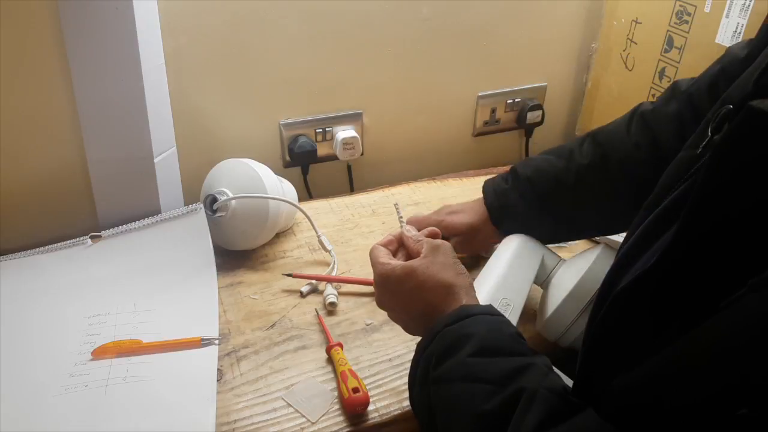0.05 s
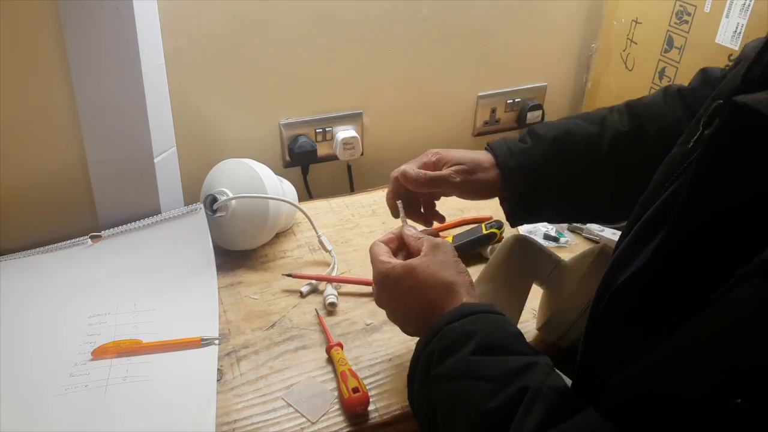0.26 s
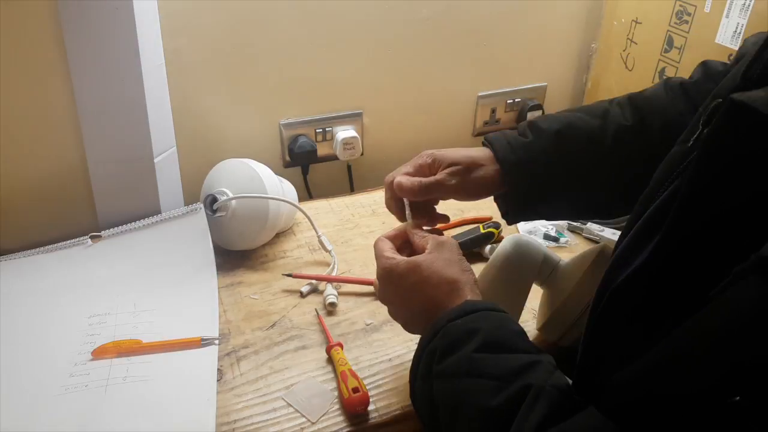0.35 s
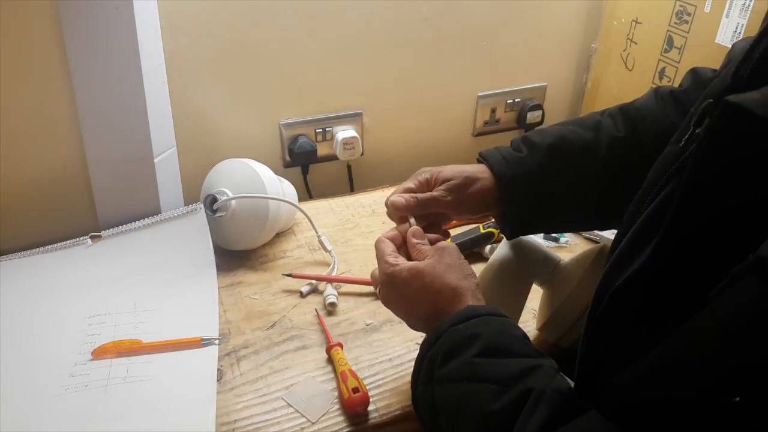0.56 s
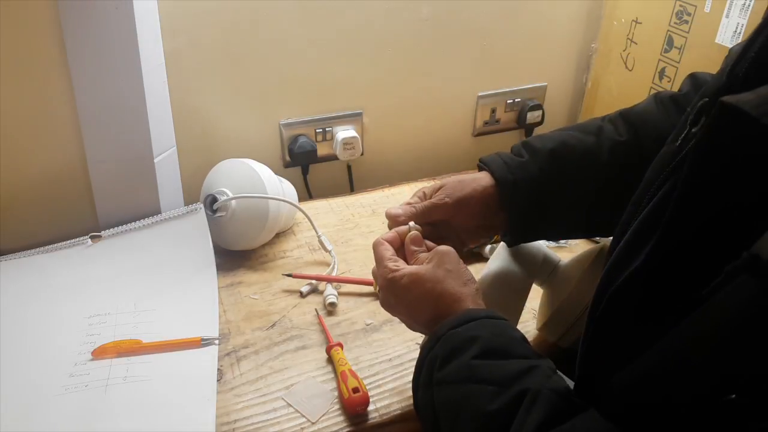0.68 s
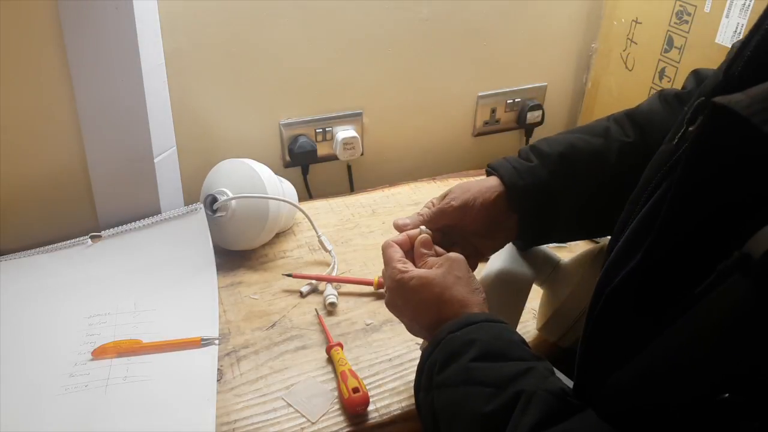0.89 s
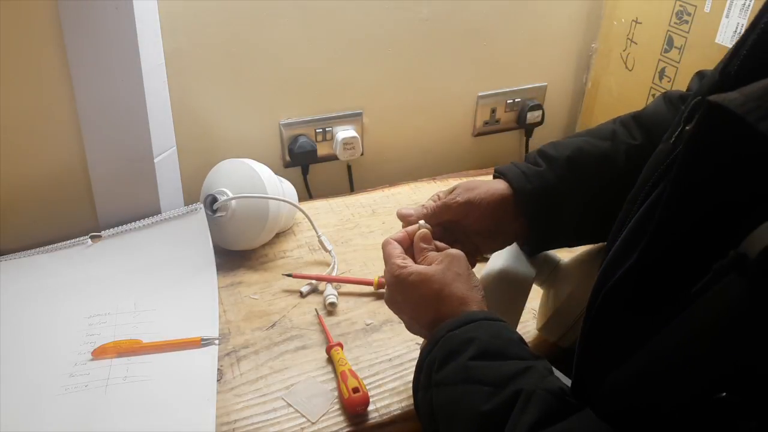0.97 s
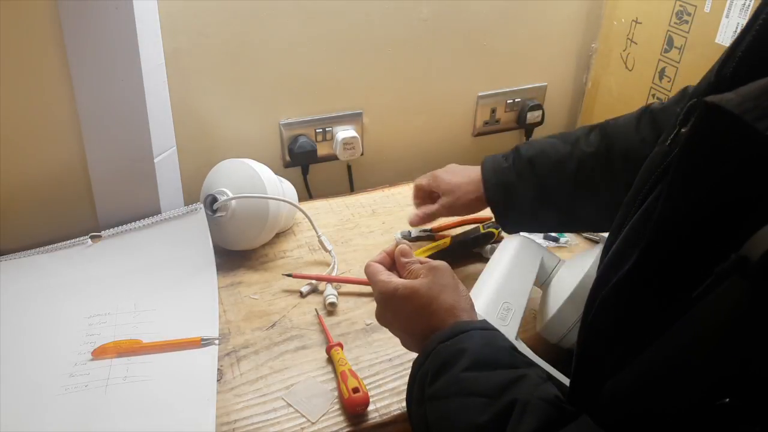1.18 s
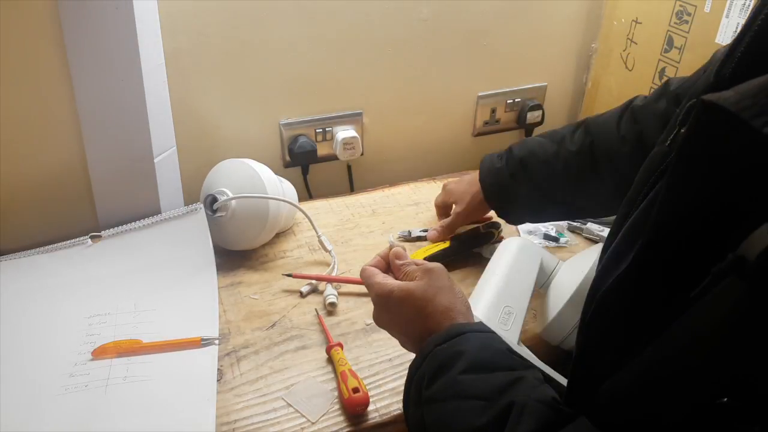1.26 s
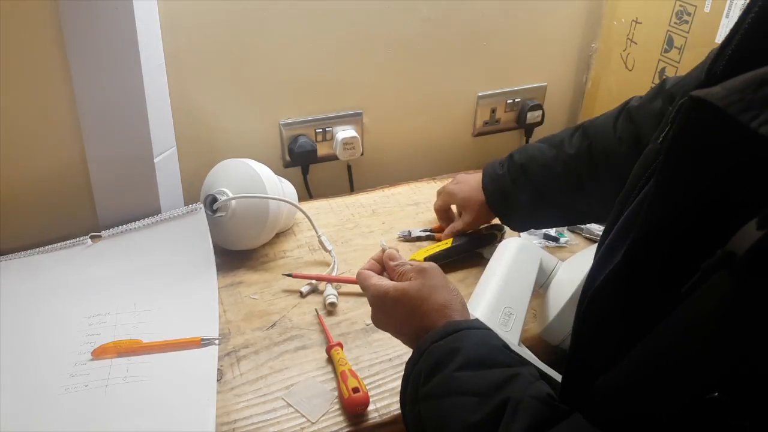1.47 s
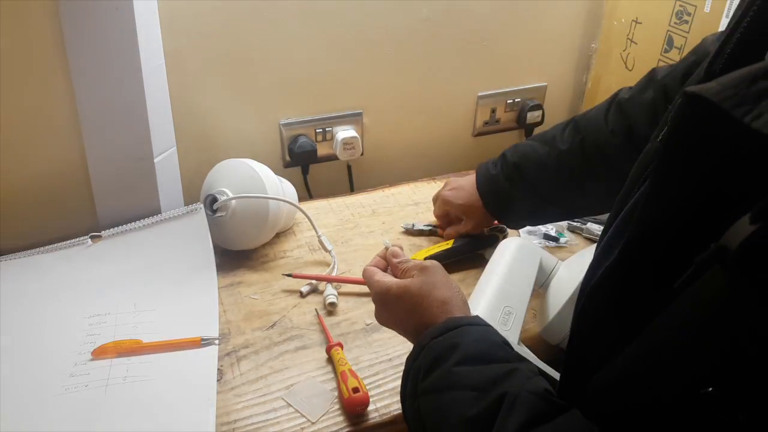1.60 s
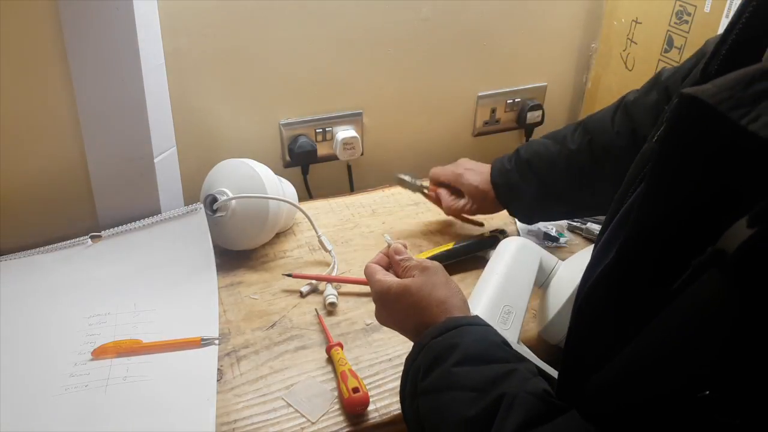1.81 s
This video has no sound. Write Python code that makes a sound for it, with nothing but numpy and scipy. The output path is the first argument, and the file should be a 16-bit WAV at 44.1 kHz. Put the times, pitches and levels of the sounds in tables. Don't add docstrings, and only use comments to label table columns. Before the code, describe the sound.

Close view of bench work in a small echoing room: metal tick, plastic grip rattle, loud tool drop with weakening bounces, near silence, soft scraping judder, a quick wire snip, then a tool laid down softly.

```python
import sys
import numpy as np
from scipy import signal
from scipy.fft import rfft, irfft
from scipy.io import wavfile
from scipy.ndimage import uniform_filter1d

SR = 44100
rng = np.random.default_rng(int(sys.argv[2]) if len(sys.argv) > 2 else 0)


def amplitude_ratio(level_db):
    exponent = np.asarray(level_db, float) / 20
    return 10 ** exponent


def put_to_file(sound):
    columns = np.atleast_2d(sound).T
    safe = np.clip(columns, -1, 1)
    whole_steps = np.round(safe * 32767)
    wavfile.write(sys.argv[1], SR, whole_steps.astype(np.int16))


N = 81585


def colour(x, points):
    p, size = np.array(points, float), 4096
    hz = np.maximum(np.arange(size // 2 + 1) * SR / size, 1)
    log_gain = np.interp(np.log(hz), np.log(p[:, 0]), p[:, 1]) * np.log(10) / 20
    cepstrum = irfft(log_gain)
    cepstrum[1:size // 2] *= 2
    cepstrum[size // 2 + 1:] = 0
    response = irfft(np.exp(rfft(cepstrum)))
    return signal.fftconvolve(x, response)[:len(x)]


def ring(x, modes):
    out = 0
    for hz, db, t60 in modes:
        pole = np.exp(2j * np.pi * hz / SR - np.log(1000) / (max(t60, .003) * SR))
        out = out + amplitude_ratio(db) * signal.lfilter([1], [1, -pole], x).imag
    return out


def unit(x):
    return x / np.sqrt(np.mean(x ** 2))


def curve(rows, outside_db=None):
    r = np.array(rows, float)
    return amplitude_ratio(np.interp(np.arange(N) / SR, r[:, 0], r[:, 1], outside_db, outside_db))


def clicks(per_s, spread_db):
    chance, sign, size = rng.random((3, N))
    happens = chance < per_s / SR
    return unit(happens * np.sign(sign - .5) * amplitude_ratio(-spread_db * np.log(size + 0.035)))


def body(push, blow, modes, tint, ring_db, wet_db):
    ring_send_db = -6
    probe = signal.unit_impulse(8192)
    plain_size = np.sqrt(np.sum(colour(probe, tint) ** 2))
    ring_size = np.sqrt(np.sum(ring(probe, modes) ** 2))
    plain = colour(push, tint) / plain_size
    rung = amplitude_ratio(ring_db) * ring(push + blow, modes) / ring_size
    return np.array([plain + rung, amplitude_ratio(wet_db) * (plain + amplitude_ratio(ring_send_db) * rung)])


def contact(rows, modes, tint, ring_db, wet_db):
    bite_s, blow_db = 0.0021, 16
    t, push, blow = np.arange(N) / SR, np.zeros(N), np.zeros(N)
    grit = clicks(per_s=7000, spread_db=1)
    for start_s, db, length_s in rows:
        age = np.maximum(t - start_s, 0)
        swell = (1 - np.exp(-age / bite_s)) * np.exp(-(age / length_s) ** 3)
        push += amplitude_ratio(db) * swell * grit * np.sqrt(0.015 / length_s)
        blow[int((start_s + bite_s) * SR)] = amplitude_ratio(db + blow_db)
    return body(push, blow, modes, tint, ring_db, wet_db)


# pitch_hz, level_db per Hz
AIR_COLOUR = [(50, -7), (118, 3), (148, -6), (185, -5), (260, 0), (700, -5), (3500, -16), (15800, -24)]


def room_hiss():
    return amplitude_ratio(-69) * unit(colour(rng.standard_normal(N), AIR_COLOUR))


# pitch_hz, level_db
EARLIER_COLOUR = [(200, -9.5), (500, -12.5), (1500, -5), (3000, -9.5), (7500, -18.5), (9000, -23.5),
                  (15500, -31.5)]


def earlier_clink():
    start_db, t60_s = -65.5, 1
    fade = amplitude_ratio(start_db - 60 * np.arange(N) / SR / t60_s)
    return fade * unit(colour(rng.standard_normal(N), EARLIER_COLOUR))


# pitch_hz, level_db (rms)
HUM = [(100, -84), (200, -70), (300, -74)]


def mains_hum():
    t, wobble_db = np.arange(N) / SR, 1.5
    wobble = rng.standard_normal((len(HUM), N))
    for _ in range(2):
        wobble = uniform_filter1d(wobble, 3000, axis=1)
    hum = np.zeros(N)
    for (hz, db), w in zip(HUM, unit(wobble)):
        hum += amplitude_ratio(db + wobble_db * w) * np.sqrt(2) * np.sin(2 * np.pi * hz * t)
    return hum


# time_s, level_db
SWAY = [(0.0, -79), (0.108, -70), (0.318, -60), (0.51, -57), (0.524, -64.5), (0.886, -92), (0.922, -78),
        (1.24, -87.5), (1.452, -67), (1.72, -70.5), (1.736, -71), (1.85, -68)]


def bench_sway():
    sway_hz, width_hz = 43, 22
    b, a = signal.iirpeak(sway_hz, sway_hz / width_hz, fs=SR)
    sway = signal.lfilter(b, a, signal.lfilter(b, a, rng.standard_normal(N)))
    sway = sway / (np.abs(signal.hilbert(sway)) + .4 * np.std(sway))
    return unit(sway) * curve(SWAY)


# pitch_hz, t60_s
ROOM_DECAY = [(150, 0.27), (400, 0.27), (1000, 0.25), (2500, 0.27), (6000, 0.26), (12000, 0.22)]


def room(x):
    rise_s, direct_db = 0.011, 0.5
    t, decay, tail = np.arange(SR * 7 // 10) / SR, np.array(ROOM_DECAY), 0
    edges = np.r_[30, np.sqrt(decay[1:, 0] * decay[:-1, 0]), 18000]
    for low_hz, high_hz, t60_s in zip(edges, edges[1:], decay[:, 1]):
        band_pass = signal.butter(2, [low_hz, high_hz], "bandpass", fs=SR, output="sos")
        band = signal.sosfilt(band_pass, rng.standard_normal(len(t)))
        tail = tail + band * amplitude_ratio(-60 * t / t60_s)
    tail = tail * (1 - np.exp(-t / rise_s))
    tail = tail / np.sqrt(np.sum(tail ** 2))
    return amplitude_ratio(direct_db) * x[0] + signal.fftconvolve(x[1], tail)[:N]


# time_s, level_db
SLIDE = [(1.16, -87), (1.19, -67), (1.21, -57), (1.245, -66.5), (1.29, -76.5), (1.4, -96), (1.55, -87),
         (1.7, -91)]
# pitch_hz, level_db, t60_s
SLIDE_MODES = [(1970, -5, 0.018), (3030, -19, 0.0096), (4040, -6.5, 0.035), (6330, -16, .01),
               (7550, 3.5, 0.013)]
# pitch_hz, level_db
SLIDE_COLOUR = [(300, -34), (900, -17.5), (2900, -15), (3630, -8.5), (4840, -20), (8500, -13),
                (11500, -22.5), (15500, -25)]


def slide():
    scrape = clicks(per_s=9500, spread_db=1.6) * curve(SLIDE, outside_db=-120)
    return body(scrape, 0, SLIDE_MODES, SLIDE_COLOUR, ring_db=-9.5, wet_db=-1.43)


# time_s, level_db
JUDDER = [(1.262, -65), (1.282, -61), (1.296, -63.5), (1.312, -56.5), (1.322, -56), (1.338, -55.5),
          (1.352, -63), (1.368, -52), (1.384, -55.5), (1.396, -60), (1.425, -60), (1.445, -84)]
# pitch_hz, level_db, t60_s
BUMP_MODES = [(150, 0, .03), (298, -12, .04), (440, -20, .04), (570, -20, .04), (1190, -26, .03)]
# pitch_hz, level_db
BUMP_COLOUR = [(59, -21.5), (100, -9.5), (144, -15.5), (312, -16), (368, -13.5), (571, -16), (8000, -44.5),
               (10400, -65), (17600, -120)]


def judder():
    jolts_per_s, jitter, scatter_db, rub_db = 150, .03, 2, -3
    uneven = rng.standard_normal((400, 2))
    at = (np.cumsum(1 + jitter * uneven[:, 0]) / jolts_per_s * SR).astype(int)
    inside = at < N
    jolts = np.zeros(N)
    jolts[at[inside]] = amplitude_ratio(scatter_db * uneven[inside, 1])
    effort = curve(JUDDER, outside_db=-120)
    rub = amplitude_ratio(rub_db) * clicks(per_s=3100, spread_db=1.9) * effort
    return body(rub, unit(jolts) * effort, BUMP_MODES, BUMP_COLOUR, ring_db=1, wet_db=-14)


# start_s, level_db, length_s
TAPS = [
    (.871, -60, 0.0048),
    (1.408, -60, 0.007),
    (1.463, -76, 0.01),
    (1.572, -68.5, .01),
]
# pitch_hz, level_db, t60_s
TAP_MODES = [(255, 5, 0.05), (638, -3, 0.035)]


def taps():
    return contact(TAPS, TAP_MODES, BUMP_COLOUR, ring_db=6.9, wet_db=-2)


# start_s, level_db, length_s
SET_DOWN = [
    (1.802, -55, 0.01),
    (1.808, -55, 0.0048),
    (1.815, -54.5, 0.0066),
    (1.832, -57.5, 0.035),
]
# pitch_hz, level_db, t60_s
SET_DOWN_MODES = [(301, 0, .1), (630, -3, .08), (1070, -2, .06), (1250, -1, .04), (1890, 1, .05),
                  (2700, -9, .04), (3130, -11, .04), (3950, -15, .03), (6680, -18, .03), (7690, -11, .05)]
# pitch_hz, level_db
SET_DOWN_COLOUR = [(100, -28), (300, -2), (1000, -1), (2000, -5.5), (4300, -20), (5200, -24.5),
                   (8000, -23.5), (15500, -44)]


def set_down():
    return contact(SET_DOWN, SET_DOWN_MODES, SET_DOWN_COLOUR, ring_db=0.1, wet_db=-3.7)


# start_s, level_db, length_s
WIRE_TICKS = [
    (.2065, -54.5, 0.0068),
    (.591, -72.5, 0.013),
    (1.605, -48.5, 0.0095),
]
# pitch_hz, level_db, t60_s
WIRE_MODES = [(6600, -6, .02), (7350, 0, .03), (8400, -3, .015), (9350, -1, .02), (9850, -1, .025),
              (11100, -6, .012)]
# pitch_hz, level_db
WIRE_COLOUR = [(500, -15), (4000, -27), (6500, -1), (10000, 0.5), (11000, -13), (13000, -12.5),
               (15500, -19)]


def wire_ticks():
    return contact(WIRE_TICKS, WIRE_MODES, WIRE_COLOUR, ring_db=-0.5, wet_db=1.2)


# start_s, level_db, length_s
JAW_TICKS = [
    (.136, -43.5, 0.021),
]
# pitch_hz, level_db, t60_s
JAW_MODES = [(125, -12, .12), (310, -9, .05), (1227, -8, .03), (2640, 1, .045), (4296, -8, .02),
             (7100, -4, .015), (9700, -7, .012), (14560, -18, .015)]
# pitch_hz, level_db
JAW_COLOUR = [(60, -27), (125, 6), (190, -21), (290, -6.5), (1230, -11.5), (2100, -20.5), (2700, -13),
              (9700, -22), (15500, -36)]


def jaw_ticks():
    return contact(JAW_TICKS, JAW_MODES, JAW_COLOUR, ring_db=-2.6, wet_db=3.0)


# start_s, level_db, length_s
GRIP_KNOCKS = [(.2105, -37, 0.0086), (.214, -43, 0.0062), (.219, -32.5, 0.0078), (.2255, -33.5, 0.004),
               (.232, -38, .008), (.2385, -38.5, 0.0049), (.253, -45, 0.0071), (.271, -47, .006),
               (.750, -70, 0.0072), (1.322, -59.5, 0.011), (1.46, -64.5, 0.026), (1.566, -64, 0.011),
               (1.578, -61.5, 0.053)]
# pitch_hz, level_db, t60_s
GRIP_MODES = [(120, -20, .08), (305.8, -2, 0.24), (656, 0.5, 0.0491), (960, -6.5, .05), (1063, 2.5, .05),
              (1270, 1.5, 0.12), (1470, 3, 0.063), (1846, 10.5, 0.032), (2393, -1, .05),
              (3520, -1.5, 0.037)]
# pitch_hz, level_db
GRIP_COLOUR = [(100, -16.5), (181, -26), (300, -12), (560, -14.5), (1060, -3), (1800, -5), (8000, -27),
               (15500, -44)]


def grip_knocks():
    return contact(GRIP_KNOCKS, GRIP_MODES, GRIP_COLOUR, ring_db=-4.0, wet_db=0.2)


# start_s, level_db, length_s
CUTS = [
    (1.609, -47, 0.0066),
    (1.615, -40.5, 0.015),
    (1.630, -51.5, 0.018),
    (1.652, -63, 0.009),
    (1.675, -79, 0.021),
    (1.71, -65, 0.075),
]
# pitch_hz, level_db, t60_s
SNIP_MODES = [(125, -11, .1), (307, 2, .12), (440, -4, .1), (947, -1, .07), (1260, -3, .06),
              (1570, -7, .05), (1920, 3, .04), (3325, -10, .1), (3815, -11, .08), (4040, -11, .04),
              (6880, -12, .08), (7310, -5, .09), (9350, -12, .03), (9840, -14, .035)]
# pitch_hz, level_db
CUT_COLOUR = [(59, -40), (100, -44.5), (300, 5.5), (394, -6.5), (438, -3), (977, -8), (1130, -2.5),
              (9540, -23.5), (15500, -52)]


def cuts():
    return contact(CUTS, SNIP_MODES, CUT_COLOUR, ring_db=1.0, wet_db=-1.6)


# start_s, level_db, length_s
REBOUNDS = [
    (.42, -34.5, 0.015),
    (.44, -39, 0.023),
    (.465, -47, .02),
]
# pitch_hz, level_db, t60_s
REBOUND_MODES = [(301, 8, 0.093), (457, 3.5, 0.13), (920, -16, 0.032), (1270, -9, 0.14), (1730, -2, 0.025),
                 (130, -17, 0.077)]
# pitch_hz, level_db
REBOUND_COLOUR = [(59, -96), (100, -8), (1230, -7), (1520, -7.5), (1920, -7.5), (2130, -12), (15500, -38.5)]


def rebounds():
    return contact(REBOUNDS, REBOUND_MODES, REBOUND_COLOUR, ring_db=-2.5, wet_db=-8.0)


# start_s, level_db, length_s
DROPS = [
    (.3235, -29.5, 0.0061),
    (.327, -23, 0.0057),
    (.333, -27.5, 0.0057),
    (.3365, -27.5, .007),
    (.344, -26, .006),
    (.350, -26, 0.0042),
    (.356, -24.5, 0.0037),
    (.361, -30, 0.0059),
    (.374, -41.5, 0.0043),
    (.394, -43.5, 0.005),
]
# pitch_hz, level_db, t60_s
BENCH_MODES = [(155, -28, .035), (289, -4, .18), (341, -8, .12), (446, -7, .1), (630, 5, .07),
               (947, -6, .07), (1003, -8, .06), (1091, -8, .05), (1221, -8, .05), (1463, -6, .05),
               (1680, -4, .045), (1880, -4, .03), (2870, -5, .015), (3680, -13, .03)]
# pitch_hz, level_db
DROP_COLOUR = [(100, -49), (290, -5.5), (520, -14), (700, -7.5), (1300, -8.5), (4500, -20), (9800, -24),
               (15500, -50)]


def drops():
    return contact(DROPS, BENCH_MODES, DROP_COLOUR, ring_db=0.78, wet_db=-6.0)


def scene():
    background = room_hiss() + earlier_clink() + mains_hum() + bench_sway()
    near = slide() + judder() + taps() + set_down() + wire_ticks()
    near = near + jaw_ticks() + grip_knocks() + cuts() + rebounds() + drops()
    bass_cut = signal.butter(3, 129, "highpass", fs=SR, output="sos")
    near = signal.sosfilt(bass_cut, near)
    return (room(near) + background)[None]


def band_limit(x):
    return signal.sosfilt(signal.butter(12, 16410, fs=SR, output="sos"), x)


def record(dry):
    low_pass = signal.ellip(10, .2, 80, 15600, fs=SR, output="sos")
    mix = signal.sosfilt(low_pass, dry)
    return band_limit(mix)


dry = scene()
out = record(dry)
put_to_file(out)
```